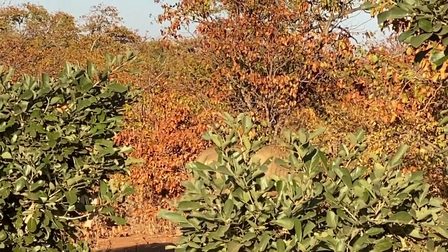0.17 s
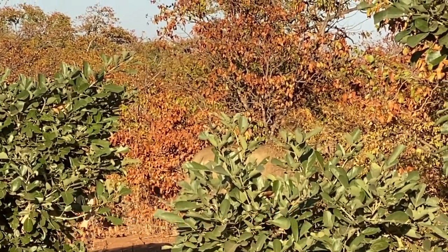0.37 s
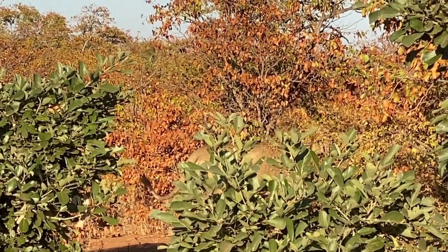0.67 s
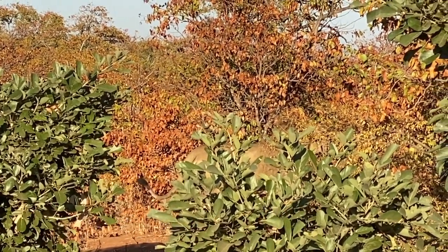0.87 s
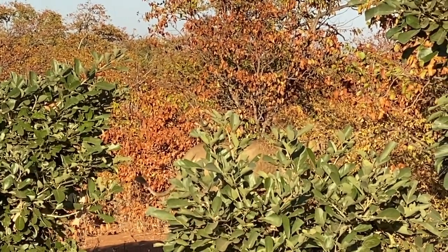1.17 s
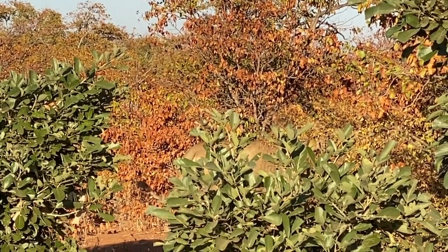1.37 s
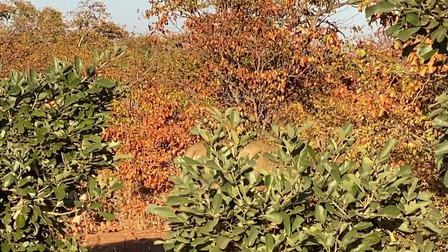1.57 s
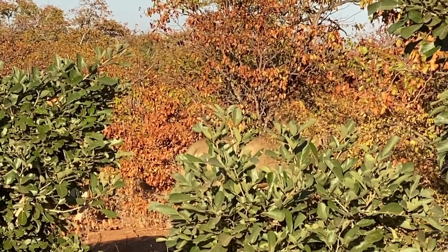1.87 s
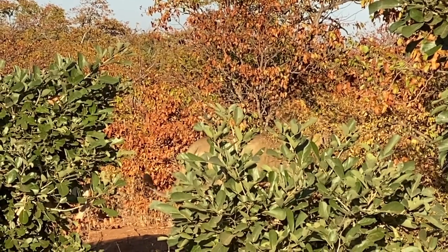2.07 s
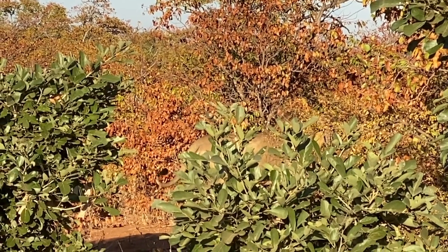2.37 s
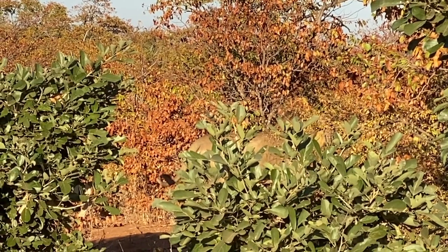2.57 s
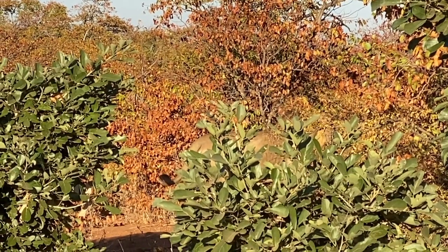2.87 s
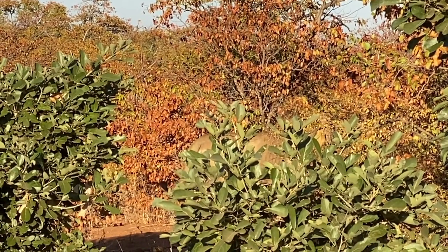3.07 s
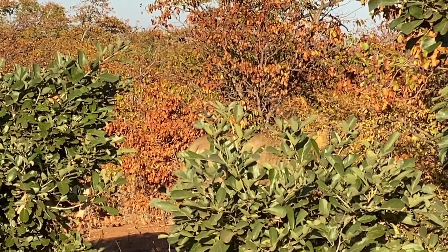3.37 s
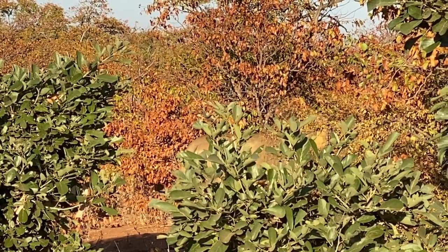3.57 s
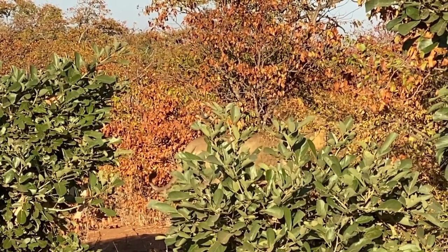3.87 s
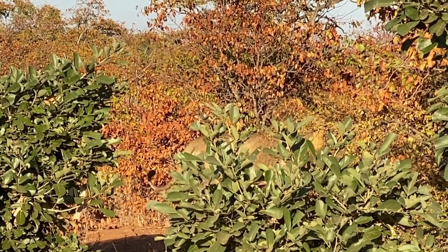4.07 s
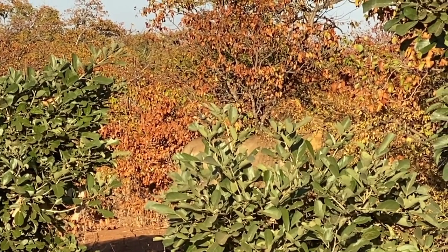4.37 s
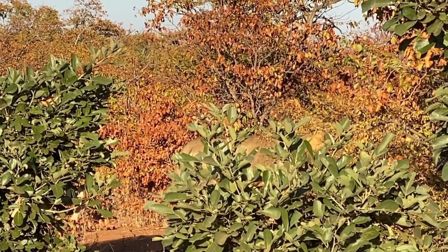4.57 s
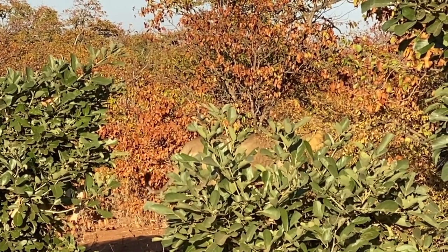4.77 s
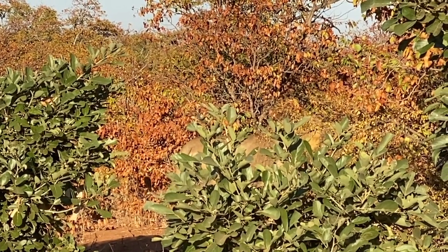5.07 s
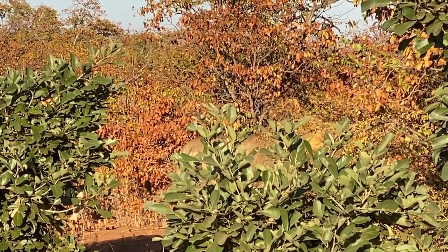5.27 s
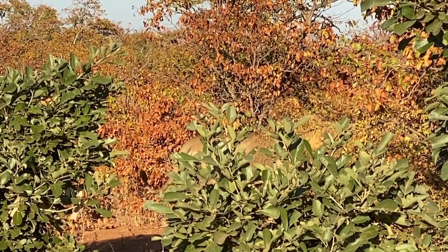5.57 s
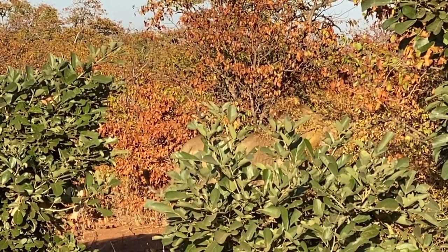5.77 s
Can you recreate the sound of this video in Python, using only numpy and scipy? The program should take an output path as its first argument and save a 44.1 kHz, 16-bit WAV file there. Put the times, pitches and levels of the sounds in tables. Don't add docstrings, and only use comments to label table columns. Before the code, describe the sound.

A big cat unseen behind shrubs calls five times: two drawn-out roars that rise from a closed-mouth moan, open hoarsely and fall into fluttering breath, then three quick gruff grunts without the moan. Dry twigs crackle between calls, sharpest before the fourth. A far slope returns soft, blurred echoes. Outdoor stereo pickup with short scattered reflections from bushes, gentle rustling and bassy wind bumps.

```python
import sys
import numpy as np
from scipy import signal
from scipy.fft import rfft, irfft, next_fast_len
from scipy.io import wavfile
from scipy.ndimage import uniform_filter1d

SR = 44100
rng = np.random.default_rng(int(sys.argv[2]) if len(sys.argv) > 2 else 0)


def magnitude_from_level(level_db):
    exponent = np.asarray(level_db, float) / 20
    return 10 ** exponent


def materialize(psi):
    bounded = np.clip(np.atleast_2d(psi).T, -1, 1)
    quanta = np.round(bounded * 32767).astype(np.int16)
    wavfile.write(sys.argv[1], SR, quanta)


N = 261954
T = np.arange(N) / SR

# time in seconds, level in dB.
CHEST_EFFORT = [
    [(.42, -55.5), (.47, -22.5), (.526, -19.5), (.735, -25.5), (.765, -11.5), (.862, -8), (1.014, -5),
     (1.22, -21), (1.33, -45.5)],
    [(1.96, -44.5), (2.03, -23.5), (2.074, -17.5), (2.216, -29), (2.4, -25), (2.504, -6.5), (2.666, -6.5),
     (2.84, -12.5), (3.0, -39.5)],
    [(3.585, -39), (3.673, -11), (3.725, -15), (3.765, -9), (3.957, -10.5), (4.057, -23), (4.1, -25),
     (4.19, -48)],
    [(4.61, -38), (4.688, -12.5), (4.76, -9), (4.86, -21.5), (4.94, -32.5), (4.99, -53.5)],
    [(5.41, -42), (5.486, -12.5), (5.546, -8), (5.69, -23), (5.73, -42), (5.79, -42.5)],
]
# mouth opens in seconds, folds go slack in seconds, throat level in dB, mouth level in dB.
CALLS = [
    (0.757, 1.091, -21.5, -37.5),
    (2.425, 2.74, -22.5, -40),
    (3.718, 4.005, -24.5, -42),
    (4.723, 4.8, -23.5, -37.5),
    (5.498, 5.6, -21.5, -39),
]
# frequency in Hz, level in dB per Hz.
OPEN_THROAT = [(140, -32), (240, -2.5), (333, 2.5), (419, 0), (489, -2.5), (531, -8), (606, -13.5),
               (636, -20.5), (749, -17), (897, -29.5), (998, -19), (1250, -34), (1350, -27), (1580, -57),
               (1700, -36), (2210, -63.5), (3740, -120)]
MOAN_AFTER_S, BREAK_S, SLACKEN_S = .15, .012, .05


def evened(x):
    return x / np.sqrt(np.mean(x ** 2) + 1e-20)


def steadied(x, size):
    return x / np.sqrt(abs(uniform_filter1d(x ** 2, size)) + 1e-12)


def read(points, hz, order=1):
    table = np.transpose(points)
    return np.interp(np.log(hz + 1), np.log(table[0] + 1), table[order])


def coloured(x, spectrum):
    gain = magnitude_from_level(read(spectrum, abs(np.fft.fftfreq(8192, 1 / SR))))
    log_gain = np.log(np.maximum(gain, 1e-5))
    taps = np.fft.ifft(np.exp(np.conj(signal.hilbert(log_gain)))).real[:4096]
    return signal.oaconvolve(x, taps)[:len(x)]


def band(x, lo_hz, hi_hz):
    return signal.sosfilt(signal.butter(3, [lo_hz, hi_hz], "bandpass", fs=SR, output="sos"), x)


def drift(count, hz):
    lowpass = signal.butter(2, hz, fs=SR / 32, output="sos")
    coarse = signal.sosfiltfilt(lowpass, rng.standard_normal(count // 32 + 40))
    return np.interp(np.arange(count) / 32, np.arange(len(coarse)), evened(coarse))


def blur(count, hz):
    return (drift(count, hz) + 1j * drift(count, hz)) / np.sqrt(2)


def pulse(t, at, half_s):
    return np.exp(-((t - at) / half_s) ** 2)


def bumps(times, lifts_db, half_s):
    return sum(db * pulse(T, s, half_s) for s, db in zip(times, lifts_db))


def stages(t, times, values):
    return np.interp(t, np.maximum.accumulate(times), values)


def fold_state(t, opens, slack):
    start = t[0]
    if opens - start > 2 * MOAN_AFTER_S:
        settled = start + MOAN_AFTER_S
        times = [start, settled - SLACKEN_S, settled, opens - BREAK_S, opens, slack - SLACKEN_S, slack]
        rough = [1, .8, .09, .09, .8, .55, 1]
        flap = [.55, .4, 0, 0, .18, .18, .78]
    else:
        times = [start, opens, slack - SLACKEN_S, slack]
        rough = [1, .85, .85, 1]
        flap = [.55, .32, .32, .78]
    return stages(t, times, rough), stages(t, times, flap)


def levels(t, opens, slack, throat_db, mouth_db):
    # time in seconds, half width in seconds, depth in dB.
    chokes = [(0.806, 0.006, 9.5), (0.919, .008, 5.5), (1.062, 0.006, 6), (1.155, 0.016, 10.5),
              (1.216, 0.0071, 8.5), (2.874, 0.0055, 7), (2.921, 0.0046, 0), (3.919, 0.0078, 0.5),
              (4.05, 0.013, 9), (4.8, 0.0086, 7.5), (5.72, 0.031, 10)]
    start, end = t[0], t[-1]
    attack, release = start + .06, end - 0.22
    moans = opens - start > 2 * MOAN_AFTER_S
    choke_db = sum(db * pulse(t, at, half_s) for at, half_s, db in chokes)
    throat = stages(t, [start, start + 0.039, attack, opens, release, end - 0.11, end],
                    [-42, -6.5, -5, 0, -1.5, -10.5, -51.5])
    shut_db = -5.5 if moans else -9
    mouth = stages(t, [start, attack, opens - BREAK_S, opens, slack - SLACKEN_S, end - 0.11, end],
                   [-32.5, shut_db, -5.5, -4, 0, -12, -32.5])
    mouth += 2 * drift(len(t), hz=7.6)
    early_db = [-63.5, -58] if moans else [-60, -52]
    top_db = -48 - 2.5 * moans
    hold_s = .05 * moans
    breath = stages(t, [start, attack, opens, release - .04 - hold_s, release + 0.051 + hold_s, end - 0.086, end],
                    [-74, *early_db, top_db - 1, top_db, -58.5, -71])
    return throat_db + throat - choke_db, mouth_db + mouth - choke_db, breath


def chest_tone(t, pitch, rough, flap):
    # time in seconds, half width in seconds, depth as a share (below 0 surges).
    slips = [(0.799, 0.025, 0.7), (0.889, 0.01, 0.94), (1.081, .03, 0.23), (2.437, 0.015, -0.7),
             (2.548, 0.009, 0.62), (2.702, 0.0062, 0.56), (2.764, 0.056, .3), (2.881, .03, 0.67),
             (3.699, 0.0098, 0.86), (3.731, 0.0054, 0.84), (3.811, .008, 0.76), (3.904, 0.0079, 0.99),
             (4.003, 0.015, 0.86), (4.81, 0.0044, 1), (5.579, 0.0058, 0.97)]
    hz = uniform_filter1d(np.interp(t, *np.transpose(pitch)), 600)
    at, half_s, _ = slips[0]
    hz = hz - 550 * half_s * pulse(t, at, half_s)
    turns = np.cumsum(hz * (1 + (.004 + .012 * rough) * drift(len(t), hz=39.28))) / SR
    shaky = (np.exp(2j * np.pi * turns) * (1 + 1.1 * flap ** 2 * blur(len(t), hz=28))).imag
    stumble = np.prod([1 - depth * pulse(t, at, half_s) for at, half_s, depth in slips], 0)
    return steadied(shaky, size=1500) * stumble, turns, hz


def moan(turns, hz):
    # frequency in Hz, level in dB.
    narrow_mouth = [(280, 13), (330, -2), (440, 1.5), (490, 4), (600, -10), (660, -15), (740, -35.5),
                    (800, -21), (930, -19.5), (1020, -44.5), (1200, -34.5), (1700, -63)]
    total = np.zeros(len(turns))
    for k in range(2, 11):
        unsteady = 1 + k ** 4 / 900 * blur(len(turns), hz=5 * k)
        total += magnitude_from_level(read(narrow_mouth, k * hz)) * (np.exp(2j * np.pi * k * turns) * unsteady).real
    return steadied(total, size=1200)


def roar(turns, hz, rough):
    total = np.zeros(len(turns))
    for k in range(3, 24):
        wander = .8 + rough * blur(len(turns), hz=3 + 1.3 * k)
        total += magnitude_from_level(read(OPEN_THROAT, k * hz / 2)) * (np.exp(1j * np.pi * k * turns) * wander).real
    return steadied(total, size=3000)


def rattle(turns):
    closures = np.floor(turns + .15 * drift(len(turns), hz=89.6))
    beats = (np.diff(closures, prepend=0) > 0) * magnitude_from_level(2.5 * rng.standard_normal(len(turns)))
    noisy = evened(beats) + 0.52 * rng.standard_normal(len(turns))
    return steadied(coloured(noisy, OPEN_THROAT), size=3000)


def rushing_breath(t, turns, clumps, flap, breath_db, opens, slack):
    # frequency in Hz, level in dB per Hz.
    breath_spectrum = [(880, -31), (1500, -1.5), (1630, -11), (1720, -5), (1900, -3.5), (2040, -8),
                       (3180, -12.5), (3610, -14.5), (3960, -13.5), (5570, -21), (6280, -20.5), (7900, -28),
                       (8610, -27), (11200, -34), (11500, -32.5), (15000, -59), (22000, -120)]
    puffs = (.9 + np.exp(-(turns % 1) / 0.88)) * clumps ** .35 * rng.standard_normal(len(t))
    air_rush = evened(coloured(puffs, breath_spectrum))
    bright = np.clip((breath_db + 81.5) / 15, 0, 1)
    air_rush = bright * air_rush + (1 - bright) * 0.63 * band(air_rush, 1100, 2600)
    pinched = .65 * (1 - flap) * np.clip((slack - t) / (slack - opens), 0, 1)
    hiss = band(air_rush, 900, 4200) + 1.2 * bright * band(air_rush, 5100, 8800)
    return (1 - pinched) * air_rush + pinched * hiss


def call(effort, pitch, opens, slack, throat_db, mouth_db):
    t = np.arange(effort[0][0], effort[-1][0], 1 / SR)
    throat_db, mouth_db, breath_db = levels(t, opens, slack, throat_db, mouth_db)
    chest_db = np.interp(t, *np.transpose(effort))
    rough, flap = fold_state(t, opens, slack)
    chest, turns, hz = chest_tone(t, pitch, rough, flap)
    clumps = magnitude_from_level(3 * flap * drift(len(t), hz=35))
    rasp = np.sqrt(1 - flap) * roar(turns, hz, rough) + np.sqrt(flap) * rattle(turns)
    open_mouth = np.clip(.15 + 1.5 * rough, 0, 1)
    throat = np.sqrt(1 - open_mouth ** 2) * moan(turns, hz) + open_mouth * rasp * clumps
    breath = rushing_breath(t, turns, clumps, flap, breath_db, opens, slack)
    mouth = steadied(band(throat + 0.053 * rasp, 860, 1700), size=2500)
    throat = band(throat, 150, 790)
    voice = magnitude_from_level(chest_db) * chest + magnitude_from_level(throat_db) * throat
    voice += magnitude_from_level(mouth_db) * mouth + magnitude_from_level(breath_db) * breath
    return round(t[0] * SR), voice * signal.windows.tukey(len(t), .02)


def slaps():
    # time in seconds, peak level in dB.
    closures = [(0.449, -30.5), (1.102, -19), (1.173, -26.5), (1.19, -37), (1.978, -48), (1.999, -31.5),
                (2.032, -25), (2.613, -27), (2.756, -23), (2.842, -46), (2.89, -33), (2.94, -38.5),
                (3.595, -33.5), (3.687, -21), (3.706, -24), (3.8, -25), (3.827, -27.5), (3.954, -22),
                (4.033, -26), (4.079, -34.5), (4.115, -48), (4.645, -26), (5.445, -45.5)]
    pulses = np.zeros(N)
    for s, db in closures:
        pulses[round(s * SR)] = -magnitude_from_level(db + 8)
    ring = coloured(signal.unit_impulse(4096), OPEN_THROAT)
    return signal.oaconvolve(pulses, ring / abs(ring).max())[:N]


def edge():
    full_hz, low_hz, tighten_s = 209, 158, .06
    rise_s, stop_s = .03, 0.22
    out, shake = np.zeros(N), .8 + .5 * blur(N, hz=14)
    for effort, row in zip(CHEST_EFFORT, CALLS):
        first = round(effort[0][0] * SR)
        age = T[:SR // 2 + SR // 5]
        opens = row[0] - first / SR
        hz = full_hz - (full_hz - low_hz) * np.exp(-age / tighten_s)
        fade = np.maximum(1 - age / rise_s, (age - opens).clip(0) / stop_s)
        db = -28 - 17 * age - 35 * fade
        span = slice(first, first + len(age))
        hum = (np.exp(2j * np.pi * np.cumsum(hz) / SR) * magnitude_from_level(db))[:N - first] * shake[span]
        octave = hum ** 2 / magnitude_from_level(db[:N - first])
        out[span] += np.sqrt(2) * (hum + 0.71 * octave).real
    return out


def bush(x):
    # frequency in Hz, time to fall by 60 dB in seconds.
    decay = [(100, 0.39), (400, 0.46), (1500, 0.39), (8000, 0.32)]
    taps = np.zeros((2, SR))
    at = np.arange(400, SR - 20, 20) + rng.integers(0, 20, (2, (SR - 401) // 20))
    np.put_along_axis(taps, at, rng.choice([-1., 1.], at.shape), 1)
    hz, t, z = signal.stft(taps, SR, nperseg=256)
    tail = signal.istft(z * magnitude_from_level(-60 * t / read(decay, hz)[:, None]), SR, nperseg=256)[1]
    return signal.fftconvolve(x[None], tail / np.linalg.norm(tail[0]), axes=1)[:, :N]


def cat():
    # time in seconds, pitch in Hz.
    pitches = [
        [(.44, 105), (.515, 148), (.63, 148), (.748, 164), (.762, 181), (.865, 187), (1.03, 154), (1.12, 128),
         (1.33, 112)],
        [(1.97, 100), (2.08, 149), (2.2, 148), (2.415, 163), (2.43, 180), (2.53, 184), (2.56, 171), (2.78, 136),
         (2.95, 109)],
        [(3.59, 105), (3.68, 152), (3.75, 152), (3.81, 160), (3.95, 137), (3.99, 126), (4.02, 131), (4.07, 123),
         (4.2, 115)],
        [(4.62, 115), (4.66, 139), (4.73, 146), (4.78, 141), (4.82, 131), (4.9, 121), (4.99, 118)],
        [(5.42, 115), (5.46, 138), (5.55, 146), (5.59, 133), (5.64, 119), (5.8, 115)],
    ]
    # frequency in Hz, left over right in dB, left lead in radians.
    cat_ports = [(60, -1.2, .1), (200, -1, .12), (350, 0, .27), (550, 2.5, .35), (750, 3, 0), (980, 6, 0),
                 (1200, 1.5, -.5), (1500, 0, 0), (2000, 0, 0), (3500, 0, .45), (5000, 0, 0), (7600, 0, 0),
                 (8700, 0, 2), (10200, 0, .7), (11500, 0, 0)]
    # frequency in Hz, side against mid in dB.
    spread = [(100, -24), (400, -6.5), (900, 3.5), (1300, -1.5), (1800, -30), (3200, -6), (5500, -21.5),
              (9500, -1), (11500, -29.5)]
    mono = slaps() + edge()
    for effort, pitch, row in zip(CHEST_EFFORT, pitches, CALLS):
        start, voice = call(effort, pitch, *row)
        mono[start:start + len(voice)] += voice
    size = next_fast_len(N + SR)
    hz = np.fft.rfftfreq(size, 1 / SR)
    left = magnitude_from_level(read(cat_ports, hz) / 2) * np.exp(.5j * read(cat_ports, hz, order=2))
    mid, side = rfft(magnitude_from_level(-12.5) * bush(mono), size)
    side = side * magnitude_from_level(read(spread, hz))
    heard = rfft(mono, size) + mid
    return irfft(np.array([heard * left + side, heard / left - side]), size)[:, :N]


def twigs():
    # start in seconds, peak level in dB.
    snap_rows = [
        (0.0776, -60),
        (0.154, -58),
        (0.2753, -57),
        (3.0703, -61.5),
        (3.2823, -49),
        (4.3319, -46.5),
        (4.361, -39.5),
        (4.3927, -36.5),
        (5.1603, -62.5),
    ]
    out, t = np.zeros(N), T[:900]
    for s, db in snap_rows:
        snap = rng.standard_normal(len(t)) * np.exp(-t / 0.0053)
        out[round(s * SR):][:len(t)] += magnitude_from_level(db - 12.5) * snap
    return signal.sosfilt(signal.butter(1, [1200, 7000], "bandpass", fs=SR, output="sos"), out)


def wash(spectrum, patchy_db, flicker_db):
    # frequency in Hz, left lead in radians, likeness from -1 to 1.
    air_ports = [(30, .1, .94), (150, .15, .95), (400, .3, .82), (600, -.3, .3), (750, 2.9, .75),
                 (1100, 1.7, .76), (1350, 1.8, .5), (1500, -.2, .9), (2000, 0, 1), (3500, .4, .94),
                 (5000, 0, 1), (7600, 0, 1), (8700, 2, .75), (10200, .5, .65), (11500, 0, .8)]
    frames, hz = N // 256 + 9, np.fft.rfftfreq(1024, 1 / SR)
    a, b, c, d, patches = rng.standard_normal((frames, 513, 5)).T
    patches = evened(uniform_filter1d(uniform_filter1d(patches, 8, 0), 10, 1))
    flicker = evened(uniform_filter1d(rng.standard_normal(frames), 5))
    left, other = a + 1j * b, c + 1j * d
    same = np.clip(read(air_ports, hz, order=2), -1, 1)[:, None]
    lag = np.exp(-1j * read(air_ports, hz))[:, None]
    z = np.array([left, lag * (same * left + np.sqrt(1 - same ** 2) * other)])
    z = z * magnitude_from_level(patchy_db * patches + flicker_db * flicker)
    noise = signal.istft(z, nperseg=1024, noverlap=768)[1]
    size = next_fast_len(N)
    gain = magnitude_from_level(read(spectrum, np.fft.rfftfreq(size, 1 / SR)))
    noise = irfft(rfft(noise, size) * gain, size)[:, :N]
    return noise / np.std(noise.mean(0))


def far_echo():
    # frequency in Hz, level in dB per Hz.
    echo_spectrum = [(56, -55), (95, -17), (108, -12.5), (138, -1), (157, 1.5), (205, -10.5), (246, -13),
                     (285, -19), (424, -13.5), (500, -22), (569, -18), (688, -26.5), (750, -30), (980, -57),
                     (1650, -120)]
    delay_s, smear_s = 0.84, 0.19
    opens, slack = np.transpose(CALLS)[:2]
    db = -48 + bumps([0.26], [10], smear_s)
    db += bumps((opens + slack) / 2 + delay_s, 5 + 0 * opens, smear_s)
    return magnitude_from_level(db) * wash(echo_spectrum, patchy_db=2.0, flicker_db=0.16)


def rustling_leaves():
    # frequency in Hz, level in dB per Hz.
    leaf_spectrum = [(440, -28), (750, 1.5), (873, 3.5), (926, -3.5), (993, 4.5), (1210, 1.5),
                     (1460, -11.5), (1600, -7), (2050, -6), (2690, -13.5), (3130, -15), (3680, -21.5),
                     (5170, -26), (8360, -42.5), (12300, -49), (16000, -64.5), (22000, -120)]
    lag_s, smear_s = 0.11, .2
    slack = np.transpose(CALLS)[1]
    db = -59.5 + 0.58 * T + bumps(slack + lag_s, 2 + 0 * slack, smear_s)
    return magnitude_from_level(db) * wash(leaf_spectrum, patchy_db=.9, flicker_db=.9)


def wind():
    # frequency in Hz, level in dB per Hz.
    wind_spectrum = [(8.8, -43.5), (15, -25), (34, -8.5), (54, 4.5), (73, -0.5), (95, 1.5), (120, -46.5),
                     (210, -120)]
    # centre in seconds, lift in dB.
    gusts = [
        (0, 0.5),
        (1.15, 8),
        (2.93, 11),
        (3.95, 8.5),
        (4.25, -0.5),
        (4.55, 3),
        (5.05, -0.5),
        (5.3, 7),
        (5.94, 2),
    ]
    return magnitude_from_level(-48 + bumps(*np.transpose(gusts), 0.22)) * wash(wind_spectrum, patchy_db=1.1, flicker_db=1.3)


def scene():
    return cat() + twigs() + far_echo() + rustling_leaves() + wind()


def top_cut(x):
    return signal.sosfilt(signal.butter(12, 12510, fs=SR, output="sos"), x)


def record(dry):
    limited = dry / (1 + (dry / .98) ** 8) ** (1 / 8)
    mirrored = limited * (1 + magnitude_from_level(-64.5) * np.cos(2 * np.pi * 11988 * T))
    lowpass = signal.firwin(511, 12560, window=("kaiser", 9), fs=SR)
    return top_cut(signal.oaconvolve(mirrored, lowpass[None], "same"))


dry = scene()
out = record(dry)
materialize(out)
```